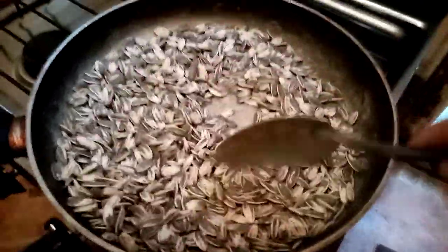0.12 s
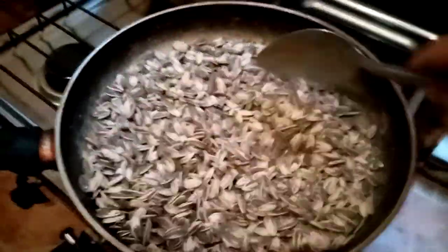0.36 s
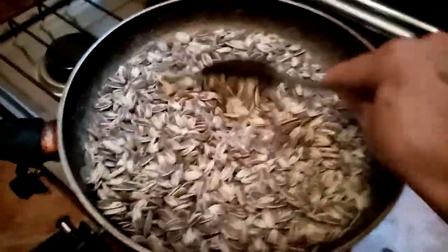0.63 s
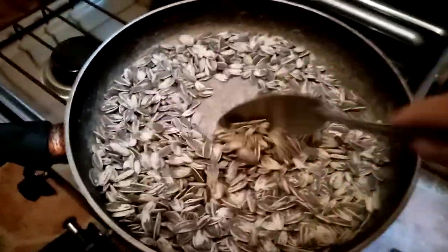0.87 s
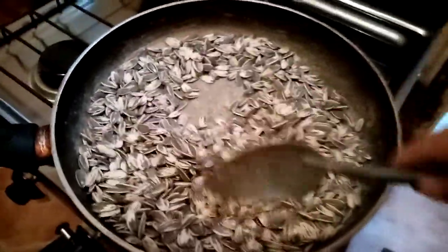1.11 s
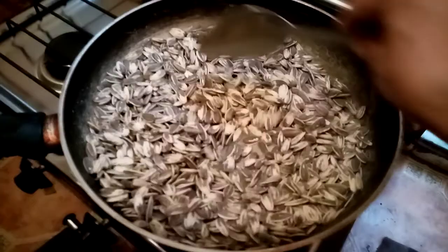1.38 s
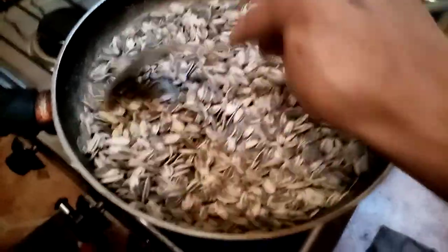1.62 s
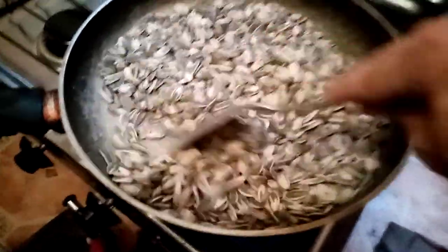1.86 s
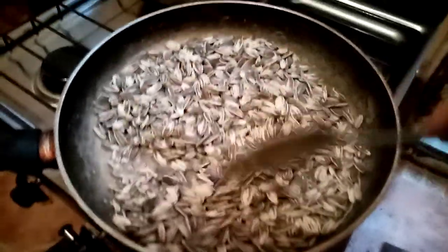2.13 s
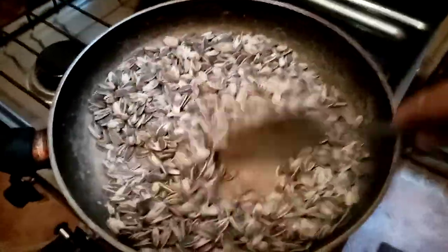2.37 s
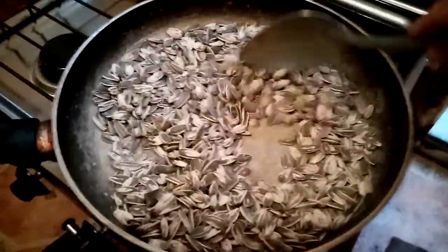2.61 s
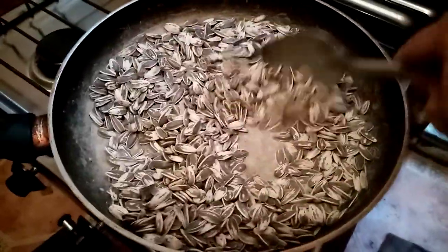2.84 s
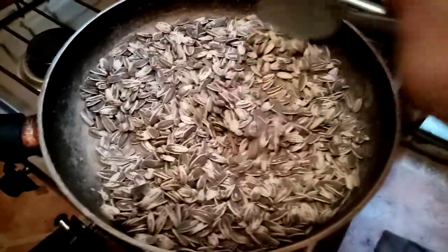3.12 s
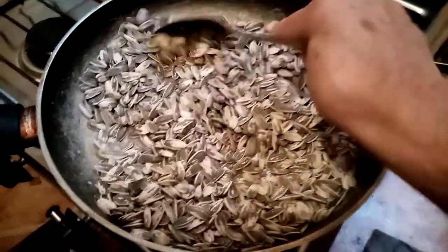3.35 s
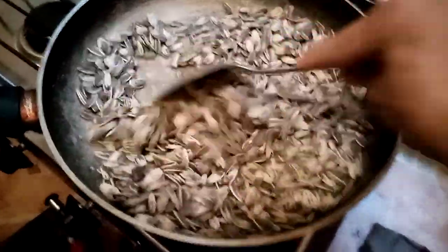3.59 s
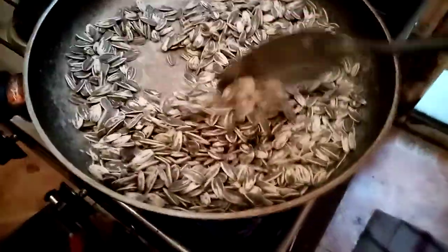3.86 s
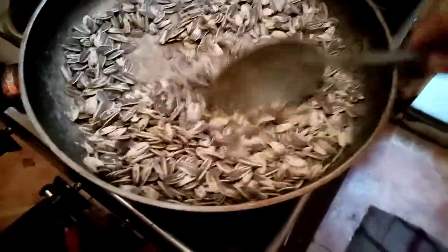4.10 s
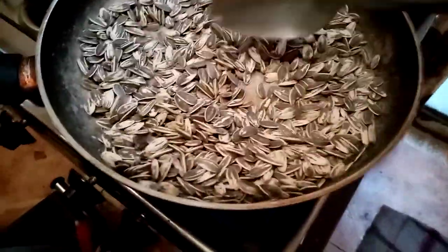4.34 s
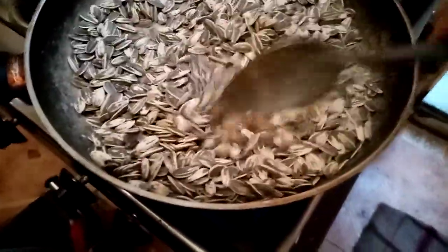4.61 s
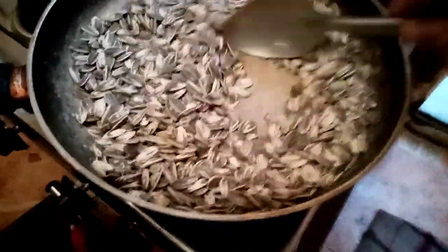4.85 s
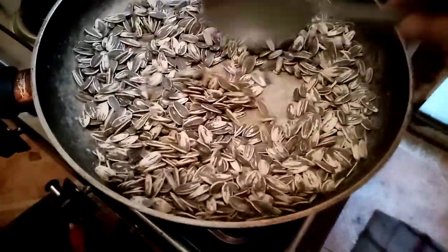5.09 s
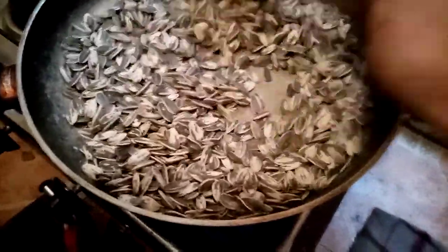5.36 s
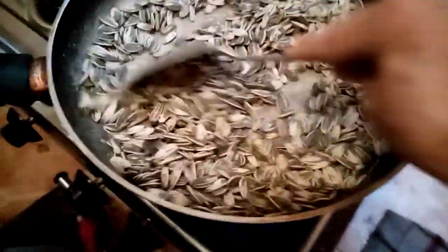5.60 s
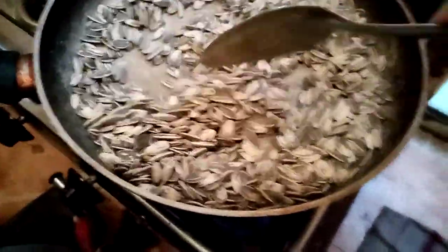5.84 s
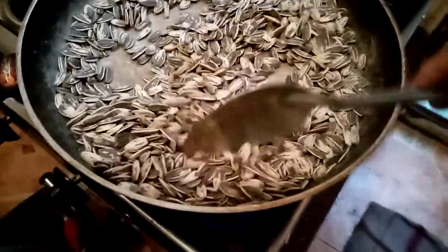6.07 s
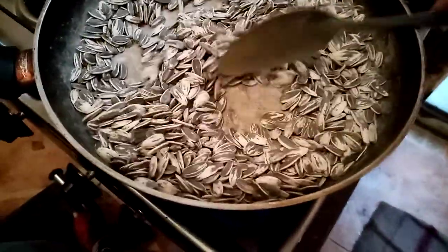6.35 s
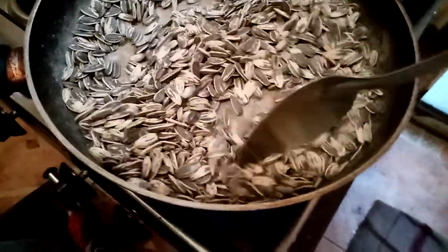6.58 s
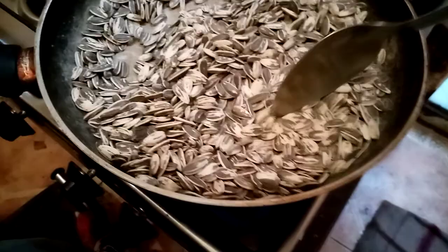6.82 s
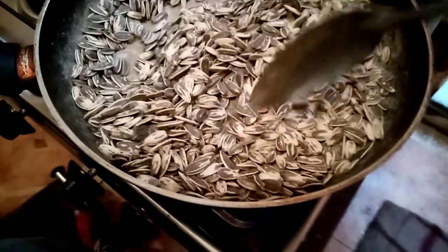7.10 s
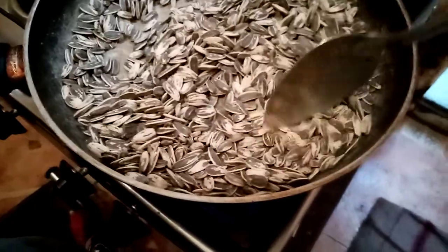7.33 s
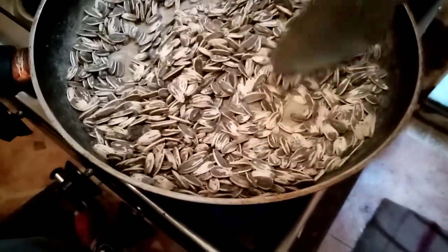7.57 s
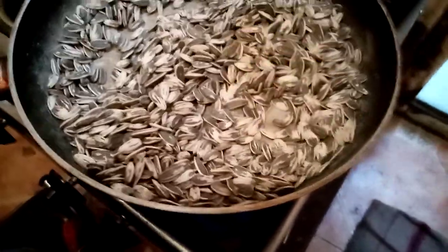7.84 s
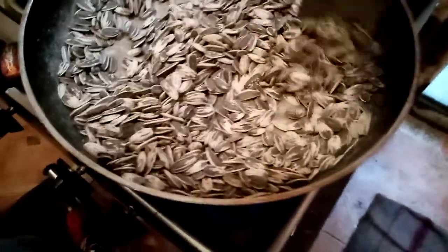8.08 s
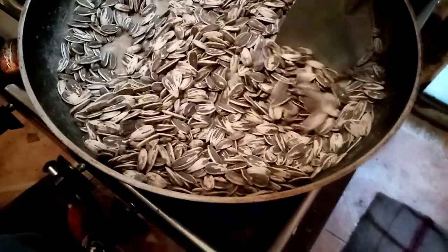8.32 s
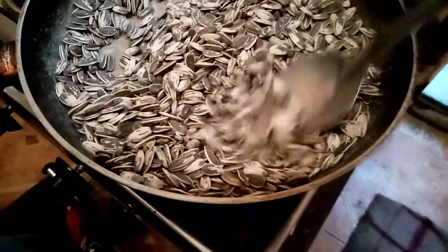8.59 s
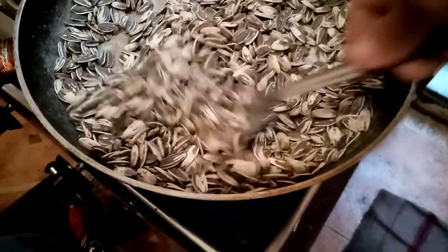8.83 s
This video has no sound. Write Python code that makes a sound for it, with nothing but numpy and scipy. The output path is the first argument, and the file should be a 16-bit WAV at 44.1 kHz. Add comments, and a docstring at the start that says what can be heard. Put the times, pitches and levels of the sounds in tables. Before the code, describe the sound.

A metal spoon stirs dry seeds in a frying pan, close and dry with a very short room response. It starts mid-stroke; light clinks come at 0.15 and 0.25 s, then a firm scraping push with a cluster of dull bottom knocks around 0.75-0.85. Softer rustling follows, then a sharp rattling push and thud near 1.75. Strokes at 2.4-4.2 s swell and fade in crisp shell clatter, with a knock at 3.45. The brightest clink lands at 4.6, followed by busy scraping to 5.8. A lower bowl tap sounds near 6.27 and a sharp tap at 6.68. Small, quick pushes thin to quiet ticks around 7.7-8.0, then a strong clink and bump near 8.2 lead into renewed rattling to the end at about 9 s. A faint low flame flutters throughout, with slight hiss. Sound is on the left; the right only hisses.

```python
"""Stirring seeds over a gas flame

A steel spoon stirs dry seeds in their shells in a frying pan over a gas burner, heard close up.
Random contacts click as shells and excite damped modes of the spoon; slips sound its bowl and the pan.
Taps are sums of decaying modes after a noise crack; bumps are short pushes that ring the pan bottom.
Filtered noise with swelling level is the flame, steady filtered noise the hiss of the kitchen.
Only the left input carries a microphone; the right one holds the hiss of its amplifier."""
import sys
import numpy as np
from scipy import signal
from scipy.fft import rfft, irfft
from scipy.io import wavfile
from scipy.ndimage import uniform_filter1d, map_coordinates

SR = 44100
rng = np.random.default_rng(int(sys.argv[2]) if len(sys.argv) > 2 else 0)


def attenuation_scalar(level_db):
    """Turn a level in dB into a linear amplitude multiplier (20 dB per decade)."""
    decades = np.asarray(level_db, float) / 20
    return 10 ** decades


def to_wav(sig):
    """Store sig (one row per channel, or 1-D mono) as 16-bit WAV at the path in sys.argv[1].

    Samples outside -1..1 are clipped; the rate is SR.
    """
    pcm = np.clip(np.atleast_2d(sig), -1, 1) * 32767
    pcm = np.round(pcm).astype(np.int16)
    wavfile.write(sys.argv[1], SR, pcm.T)  # frames by channels


N = 394694

# All levels in the tables are relative; the functions add the gain of each layer.
# the spoon drops into the seeds and they splash: [t/s, splash level/dB, t60/ms]
LANDINGS = [(0.0, -45, 60), (.244, -27.5, 380), (.538, -33.5, 550), (1.157, -31, 270), (1.722, -33.5, 890),
            (2.143, -31, 200), (2.273, -33, 100), (3.215, -32, 330), (3.985, -36, 430), (4.354, -35, 160),
            (4.588, -23, 200), (5.311, -27.5, 420), (6.087, -36, 600), (6.119, -25, 110),
            (6.494, -31.5, 60), (6.672, -29, 790), (7.314, -32.5, 420), (8.048, -31, 800)]
# the spoon pushes through the seeds: [peak t/s, clatter level/dB, time to rise 10 dB/ms,
# slide under the bowl over the clatter/dB, pressure on the bottom over the clatter/dB]
PUSHES = [(0.01, -37.2, 75, -6.0, -8.0), (0.201, -42.5, 52.5, -2.5, -4.5), (0.303, -43.5, 89.5, -0.5, -4),
          (0.73, -31.5, 97, -8, -12.5), (0.772, -37, 31.5, -3, 10.5), (0.837, -37.8, 77, -3, 4.5),
          (1.037, -44.8, 171.5, -9, -7.5), (1.238, -35.6, 79, -5, -12.0), (1.344, -37, 87, -5.0, -4.0),
          (1.74, -27.5, 12.5, -32, -17), (1.794, -41.5, 23, 1, 9.5), (1.918, -33.0, 94, -2.0, -2),
          (2.03, -47, 206.5, -10.0, -5.5), (2.384, -32, 74.5, -5.5, -25), (2.471, -33.5, 83, -3.5, -1.0),
          (2.693, -41.5, 59, -9.5, -11.5), (2.822, -34.5, 56.5, -12.5, -14.5), (2.939, -33, 54, -6, -8.5),
          (3.069, -41.5, 105.5, -5, -6), (3.277, -34, 14.5, -15, -28), (3.416, -32.5, 120, -15.5, -14.5),
          (3.544, -32.7, 71, -6.5, -8.5), (3.626, -29.2, 39, 0, -9.0), (3.697, -34, 65.5, -1.0, 0.5),
          (3.859, -45.5, 131, -6.0, -6), (4.034, -37.5, 57, -9.5, -15.5), (4.167, -31.5, 43, -10.5, -27),
          (4.225, -34.8, 102, -3.5, -5.5), (4.664, -31.5, 39.5, -6.5, -16.5), (4.76, -28.5, 55, -5.5, -6.5),
          (4.88, -36.5, 90.5, -1.5, -5.5), (5.073, -37.5, 70.5, -6.5, -6.0), (5.209, -47, 59, -2.5, -4.5),
          (5.442, -33.5, 66, -10.0, -20.5), (5.599, -30.5, 100, -6.5, -8.5),
          (5.684, -50.5, 89.5, 10.5, -17), (5.774, -37, 76, -2, -5.5), (6.014, -54, 250, 2.5, 0),
          (6.248, -30, 48, -5.5, -29), (6.314, -36, 82, -1, 3), (6.509, -47.5, 69.5, -1, -3.0),
          (6.751, -45, 157.5, 1, -4.0), (6.853, -36.5, 12, -4.5, -14), (6.915, -37, 11.5, -25, -28),
          (7.003, -42.2, 40, -9.0, -11.0), (7.378, -38.5, 62.5, -8.5, -13.0),
          (7.48, -38.5, 20.5, -8.0, -9.0), (7.528, -37, 10.5, -3, -13.5), (7.593, -41, 53, -1, -12),
          (7.72, -59.5, 38.5, 5, -2.0), (8.158, -33.5, 86, -7.5, -24), (8.221, -33, 32.5, 1, 0.5),
          (8.3, -35, 50, -3.5, -2.0), (8.385, -48, 118.5, -2, -4), (8.665, -34, 91, -3, -1.5),
          (8.804, -33.5, 71, 0.5, -5.5), (8.93, -34, 97, -6, -20)]
# one row each for clatter, slide, drag: [layer gain/dB, landing splash/dB, jolt of a bump/dB]
STROKE_LAYERS = [(0.78, -1, -25.5), (1.78, -18, -24.5), (1.16, -27.5, -17)]
# hollow shells clicking: [f/Hz, spectral level/dB]
SHELL_COLOUR = [(500, -67.5), (1800, -31), (2600, -2), (3500, -6.5), (5500, -4), (7300, -4.5), (16000, 2)]
# shells differ in size, each with its own short note: [f/Hz, level/dB, t60/s]
SHELL_NOTES = [(2900, -9, .008), (3400, -4, .008), (4000, -4, .007), (4600, -4, .007), (5300, -4, .006),
               (6000, -3, .006), (6700, -2, .006), (7300, 0, .006), (8500, -1, .004)]
# stiff modes of the spoon: [f/Hz, level/dB, free t60/s]
SPOON_MODES = [(3730, -8, .15), (4532, -5, .15), (4845, -8, .15), (5257, -9, .28), (5710, -3, .18),
               (6210, -8, .12), (7025, -5, .15), (7058, -3, .27), (7310, -5, .1), (7447, 0, .15),
               (8400, -5, .12), (9095, 0, .15), (9430, -2, .12), (10100, -3, .1), (11700, 0, .04),
               (12300, 0, .1), (14600, 0, .1), (15300, 3, .1)]
# bending modes of the spoon's bowl: [f/Hz, level/dB, free t60/s]
BOWL_MODES = [(1080, -9, .25), (1660, -5, .2), (1695, -2, .25), (1932, -7, .25), (2552, -6, .22),
              (3420, -8, .2), (3465, -6, .25)]
# shells sliding under the bowl: [f/Hz, spectral level/dB]
SLIDE_COLOUR = [(400, -17.5), (1300, -13), (1700, -0.5), (2600, 7), (3300, -11.5), (7000, -26.5)]
# dull body of the drag: [f/Hz, spectral level/dB]
DRAG_COLOUR = [(60, -75.5), (200, -37.5), (420, -8.5), (600, -0.5), (1200, 3), (1450, -20.5), (2500, -36),
               (6000, -55)]
# modes of the pan bottom, damped by the seeds: [f/Hz, level/dB, t60/s before further damping]
PAN_MODES = [(489, -4, .06), (570, -4, .05), (640, -2, .06), (775, 1.5, .07), (975, -3, .06),
             (1047, -2, .06), (1139, -2, .06), (1195, -3, .05)]
# the gas flame: [f/Hz, spectral level/dB]
FLAME_COLOUR = [(24, -8.5), (40, -17), (64, -21), (108, -13.5), (148, -2.5), (172, -11), (207, 2),
                (240, -7), (342, -7), (377, -26), (420, -16.5), (550, -39), (920, -120)]
# the flame swells: [peak t/s, level/dB, time to fall 10 dB on either side/s (its sign has no effect)]
FLARES = [(.01, -48, -0.13), (.69, -43, 0.36), (1.45, -46.5, 0.34), (1.82, -34, 0.0855), (1.98, -41, 0.33),
          (2.14, -39.5, 0.08), (2.79, -36.5, 0.14), (3.33, -46, 0.56), (3.6, -43, 0.56), (3.95, -38.5, 0.2),
          (4.31, -43, -0.03), (4.64, -41, 0.04), (4.95, -43.5, 0.24), (5.63, -45, 0.5), (6.17, -43.5, 0.27),
          (6.77, -38.5, -0.03), (7.03, -49, -0.24), (7.38, -43.5, -0.1), (8.22, -42, 0.02),
          (8.42, -46.5, 0.17), (8.9, -45, 0.83)]
# faint hiss of the kitchen: [f/Hz, spectral level/dB]
KITCHEN_COLOUR = [(240, -23.5), (400, -5.5), (462, -2), (830, -7), (2010, -12.5), (7210, -17.5),
                  (9000, -35.5), (11700, -69), (19800, -120)]
# the spoon's edge bumps the pan bottom: [t/s before the onset delay, level/dB]
BUMPS = [(.029, -21), (.745, -8), (.758, -7.5), (.768, -21.5), (.798, -5), (.82, -7), (1.737, -29),
         (1.784, -4.5), (2.012, -12), (2.46, -12.5), (3.457, -5), (3.534, -17), (4.776, -11), (5.566, -13),
         (5.773, -19.5), (6.33, -13.5), (6.342, -13), (8.192, -8), (8.285, -10.5), (8.459, -29),
         (8.665, -9.5), (8.771, -24)]
# the spoon strikes shells or rim: [t/s, level/dB, leading mode f/Hz, share of the free ring time 0-1]
TAPS = [(0.1497, -27.5, 4220, 0.04), (0.245, -15, 7470, 0.14), (0.539, -22, 7430, 0.05),
        (.5654, -22.5, 7450, 0.18), (.6893, -17.5, 7350, 0.19), (1.0448, -34, 5260, 0.6),
        (1.1573, -28, 7040, .1), (1.178, -22, 7040, 0.2), (1.255, -21, 7460, 0.3), (1.722, -28, 7400, 0.3),
        (1.733, -26, 7070, .02), (2.1431, -26, 5260, 0.85), (2.3686, -19.5, 5710, 0.15),
        (2.6923, -28, 7450, 0.25), (2.8956, -22, 7280, 0.22), (2.924, -18, 7270, 0.13),
        (3.0899, -26, 3490, 0.22), (3.2176, -21.5, 7330, 0.1), (3.2892, -26, 3750, 0.19),
        (3.8382, -25, 3720, 0), (3.8752, -28, 7100, 0), (3.9853, -22, 7450, 0.06), (4.1659, -21, 7120, 0.1),
        (4.2138, -16, 7490, 0.18), (4.3546, -24, 4520, 0.15), (4.5384, -50, 5680, .16),
        (4.5975, -10.5, 7500, 0.2), (4.6607, -15, 7060, 0.07), (4.7358, -19, 7010, 0.6),
        (5.076, -21, 7060, 0.12), (5.1138, -28, 7330, 0.2), (5.1911, -35, 7000, 0.17),
        (5.253, -35, 3460, 0.2), (5.3107, -19.5, 7430, 0.17), (5.5244, -19.5, 7250, 0.3),
        (5.5865, -14.5, 7020, 0.2), (5.683, -21.5, 7020, 0.33), (6.0886, -26.5, 5270, 0.17),
        (6.12, -23.5, 7410, 0.2), (6.2228, -16, 7460, 0.15), (6.267, -13, 1680, .06),
        (6.4944, -26, 5740, 0.26), (6.6781, -14.5, 3890, 0.09), (6.7115, -21, 7050, .22),
        (6.7595, -23, 7440, 0.22), (6.8446, -24, 5860, 0.14), (7.0287, -37.5, 5270, 0.5),
        (7.084, -40, 7080, 0.13), (7.126, -46, 1690, 1), (7.14, -50, 1080, 1), (7.1964, -53, 2550, .9),
        (7.2084, -56, 3465, .8), (7.3166, -23, 5280, .22), (7.36, -29, 3490, .13), (7.416, -22, 4520, 0.13),
        (7.5235, -28.5, 3650, 0.27), (7.7263, -41.5, 3480, 0.2), (7.9794, -60, 1930, .26),
        (8.0476, -31, 4800, 0.1), (8.0539, -24, 7040, 0.3), (8.0716, -27, 7050, 0.07),
        (8.104, -25, 7260, 0.3), (8.1933, -12.5, 1700, 0.21), (8.2406, -22.5, 5710, 0.33)]
# response of the microphone: [f/Hz, gain/dB]
MICROPHONE = [(20, -51.5), (60, -7), (110, -4), (7550, -3), (8200, -16.5), (9600, -20), (10700, -28.5),
              (13000, -36), (15000, -31), (16000, -36.5)]
# amplifier hiss of the unused input: [f/Hz, spectral level/dB]
AMPLIFIER_COLOUR = [(20, -16), (60, -3), (110, 0), (300, -7), (800, -13), (2000, -17), (6000, -19),
                    (8000, -30), (13500, -32), (15000, -22)]


def unit(x):
    """Normalisation: the mean power is scaled to 1."""
    return x / np.sqrt(np.mean(x ** 2) + 1e-20)


def wobble(rate):
    """Random modulation: straight lines join independent normal knots, rate of them a second."""
    knots = rng.standard_normal(int(N * rate / SR) + 4)
    return map_coordinates(knots, [np.arange(N) * rate / SR], order=1)


def coloured(x, points):
    """Minimum-phase filtering: the folded cepstrum turns (Hz, dB) gains into a causal response."""
    hz, db = np.transpose(points)
    size = 4096
    # the 1 Hz offset avoids the logarithm of zero
    log_hz = np.log(np.fft.rfftfreq(size, 1 / SR) + 1)
    gain = attenuation_scalar(np.interp(log_hz, np.log(hz), db))
    cepstrum = irfft(np.log(gain))
    cepstrum[1:size // 2] *= 2
    cepstrum[size // 2 + 1:] = 0
    response = irfft(np.exp(rfft(cepstrum)))
    return signal.oaconvolve(x, response)[:N]


def contacts(per_second, spread_db):
    """Shot noise: random single contacts, most small and a few large, with rms 1."""
    chance, size, sign = rng.random(N), rng.exponential(size=N), rng.standard_normal(N)
    happens = chance < per_second / SR
    return unit(happens * attenuation_scalar(spread_db * np.minimum(size, 5.5)) * sign)


def clicks(force, points):
    """Impulse response: each contact sounds as a short click of this colour, the level kept."""
    filter_gain = np.std(coloured(rng.standard_normal(N), points))
    return coloured(force, points) / filter_gain


def ringing(force, modes, damping, move_db, move_rate):
    """Modal resonance: force rings each mode; the contact point wanders, so each swells on its own."""
    out = np.zeros(N)
    for hz, db, t60 in modes:
        radius = attenuation_scalar(-60 / (t60 * damping * SR))  # decay per sample
        drive = force * attenuation_scalar(db + move_db * wobble(move_rate))
        zeros = np.sqrt(1 - radius * radius) / 2 * np.array([1, 0, -1])
        poles = [1, -2 * radius * np.cos(2 * np.pi * hz / SR), radius * radius]
        out += signal.lfilter(zeros, poles, drive)
    return out


def dying(t, s, db, t60):
    """Exponential decay: each event raises the power at once, which falls 60 dB in t60."""
    power = attenuation_scalar(2 * (db - 60 * np.abs(t - s) / t60))
    return (power * (t >= s)).sum(axis=0)


def stroke_levels():
    """Addition of powers: landings and bumps die away; pushes swell and fade, never before their landing."""
    step = 64  # samples
    fall_over_rise, jolt_t60_s = 1.58, 0.065
    settle_db, settle_t60_s = -21.5, 0.6
    t = np.arange(0, N + step, step) / SR
    landing_s, landing_db, landing_t60_ms = np.transpose(LANDINGS)
    splash = dying(t, landing_s[:, None], landing_db[:, None], landing_t60_ms[:, None] / 1000)
    bump_s, bump_db = np.transpose(BUMPS)[:, :, None]
    jolt = dying(t, bump_s, bump_db, jolt_t60_s)
    s, db, rise_ms, slide_db, press_db = np.transpose(PUSHES)[:, :, None]
    width_s = rise_ms / 1000 * np.where(t < s, 1, fall_over_rise)
    swell_db = db - 10 * ((t - s) / width_s) ** 2
    landed = t >= landing_s[np.searchsorted(landing_s, s) - 1]
    levels, keep = [], attenuation_scalar(-120 * step / SR / settle_t60_s)
    for (gain_db, splash_db, jolt_db), share_db in zip(STROKE_LAYERS, (0, slide_db, press_db)):
        pushes = (landed * attenuation_scalar(2 * (swell_db + share_db))).sum(axis=0)
        power = pushes + attenuation_scalar(2 * splash_db) * splash + attenuation_scalar(2 * jolt_db) * jolt + 1e-10
        # stray shells roll on after each movement
        settling = signal.lfilter([1 - keep], [1, -keep], power)
        power = power + attenuation_scalar(2 * settle_db) * settling
        levels.append(gain_db + np.interp(np.arange(N) / SR, t, 10 * np.log10(power)))
    return levels


def shell_clatter(level_db, clumps):
    """Excitation by many impacts: shells tumble in clumps, sound their own notes and ring the spoon."""
    # a slower spoon moves fewer shells: the clatter thins out to single ticks
    per_second = 12000 * np.clip(attenuation_scalar(0.96 * (level_db + 38.5)), 0.05, 1)

    def tumble(share):
        """Shot noise of a share of the contacts, at the level of the clatter."""
        ticks = contacts(per_second * share, spread_db=2.5)
        return attenuation_scalar(level_db) * unit(clumps * ticks / np.sqrt(per_second))

    ticks = tumble(1)
    notes = np.zeros(N)
    for note in SHELL_NOTES:
        # each size of shell has contacts of its own
        notes += ringing(tumble(0.06), [note], damping=1, move_db=4, move_rate=45)
    spoon = ringing(ticks, SPOON_MODES, damping=0.28, move_db=5.5, move_rate=13)
    return attenuation_scalar(1.0) * clicks(ticks, SHELL_COLOUR) + attenuation_scalar(-2.5) * notes + attenuation_scalar(-6) * spoon


def shell_slide(level_db, clumps):
    """Sliding friction: shells slip under the bowl and excite its strongly damped bending modes."""
    slips = attenuation_scalar(level_db) * unit(clumps * contacts(5000, spread_db=2))
    pressed = ringing(slips, BOWL_MODES, damping=0.1, move_db=6, move_rate=8)
    return attenuation_scalar(-3) * clicks(slips, SLIDE_COLOUR) + attenuation_scalar(-1.5) * pressed


def edge_drag(level_db):
    """Stuttering friction: the edge drags along the bottom and excites the modes of the pan."""
    unevenness = attenuation_scalar(1.6 * wobble(60))
    stutter = attenuation_scalar(level_db) * unit(unevenness * contacts(2500, spread_db=1.4))
    pan = ringing(stutter, PAN_MODES, damping=1.0, move_db=2.0, move_rate=11)
    return attenuation_scalar(-1.5) * clicks(stutter, DRAG_COLOUR) + attenuation_scalar(-3.0) * pan


def stirring():
    """Superposition: clatter and slide share the clumps of shells, and the drag is added."""
    clatter_db, slide_db, drag_db = stroke_levels()
    clumps = attenuation_scalar(1.4 * wobble(35) + 0.97 * wobble(110))
    return shell_clatter(clatter_db, clumps) + shell_slide(slide_db, clumps) + edge_drag(drag_db)


def flame():
    """Modulated noise: the gas flame hums low, flutters and swells, the powers of its flares adding."""
    t = np.arange(N) / SR
    coarse_t = t[::64]
    power = attenuation_scalar(2 * -53)  # between the flares
    for s, db, width_s in FLARES:
        power = power + attenuation_scalar(2 * db - 20 * np.minimum(((coarse_t - s) / width_s) ** 2, 9))
    level = np.interp(t, coarse_t, np.sqrt(power))
    flutter = attenuation_scalar(1.6 * wobble(12))
    return level * flutter * unit(coloured(rng.standard_normal(N), FLAME_COLOUR))


def kitchen():
    """Stationary noise: the faint hiss of the kitchen."""
    return attenuation_scalar(-69.5) * unit(coloured(rng.standard_normal(N), KITCHEN_COLOUR))


def bumps():
    """Pulse excitation: each bump is a short decaying push that rings the pan bottom."""
    push, t = np.zeros(N + SR), np.arange(SR // 50) / SR
    push_hz, onset_delay_s = 1020, 0.0011
    cycles = t * push_hz
    shape = cycles ** 1.5 * np.exp(-3 * cycles) * np.sin(2 * np.pi * cycles)
    for s, db in BUMPS:
        start = round((s + onset_delay_s) * SR)
        push[start:start + len(t)] -= attenuation_scalar(db + 17.5) * shape
    push = push[:N]
    ring = ringing(push, PAN_MODES + BOWL_MODES[:3], damping=0.62, move_db=0.5, move_rate=30)
    return push + attenuation_scalar(-23.0) * ring


def taps():
    """Modal decay after impact: a short crack, then the mode nearest the struck spot leads the ring."""
    out, t = np.zeros(N + SR), np.arange(SR // 3) / SR
    hz, level, t60 = np.transpose(BOWL_MODES + SPOON_MODES)[:, :, None]
    for s, db, lead_hz, free in TAPS:
        distance = np.abs(hz - lead_hz)
        leads = distance == distance.min()
        # a light strike hardly moves the low, heavy modes unless it lands on them
        strength = level - 6 * (hz < 3000) + 11 * leads + 3 * rng.standard_normal(hz.shape)
        decay = attenuation_scalar(strength - 60 * t / (t60 * np.clip(free, 0.02, 1)))
        modes = decay * np.sin(2 * np.pi * (hz * t + rng.random(hz.shape)))
        onset = 1 - np.exp(-t / 0.00033)
        ring = modes.sum(axis=0) * onset / np.linalg.norm(attenuation_scalar(strength))
        # differencing twice brightens the noise
        bright = np.gradient(np.gradient(rng.standard_normal(len(t)))) / 0.23
        crack = 0.26 * attenuation_scalar(-60 * t / 0.029) * bright
        start = round(s * SR)
        out[start:start + len(t)] += attenuation_scalar(db + 5.0) * (ring + crack)
    return out[:N]


def walls(x):
    """Diffuse reverberation: decaying noise is the short answer from the pan wall and the kitchen."""
    t = np.arange(SR // 3) / SR
    tail = rng.standard_normal(len(t)) * attenuation_scalar(-60 * t / 0.18)
    delayed = np.pad(x, (130, 0))  # samples
    return signal.oaconvolve(delayed, tail / np.linalg.norm(tail))[:N]


def treble_dropouts(x, from_hz, depth_db):
    """Time-frequency masking: random patches of the top treble drop out."""
    hz, t, z = signal.stft(x, SR, nperseg=1024)
    field = uniform_filter1d(rng.standard_normal(z.shape), size=11, axis=0)
    field = uniform_filter1d(field, size=4, axis=1)
    gain = attenuation_scalar(4 - depth_db * np.clip(unit(field) + 0.2, 0, 3))
    z = z * np.where(hz[:, None] > from_hz, gain, 1)
    return signal.istft(z, SR, nperseg=1024)[1][:N]


def scene():
    """Superposition: everything reaches one microphone; the other input has none."""
    pan = stirring() + bumps() + taps()
    left = pan + attenuation_scalar(-11.0) * walls(pan) + flame() + kitchen()
    return np.array([left, np.zeros(N)])


def low_pass(x):
    """Removes everything above the highest recorded frequency."""
    return signal.sosfilt(signal.butter(12, 15600, fs=SR, output="sos"), x)


def record(dry):
    """Transducer response: the deep bass is cut and 7.5 kHz upward dulled; the unused input only hisses."""
    heard = coloured(dry[0], MICROPHONE)
    left = attenuation_scalar(4) * treble_dropouts(heard, from_hz=9800, depth_db=15)
    right = attenuation_scalar(-75.3) * unit(coloured(rng.standard_normal(N), AMPLIFIER_COLOUR))
    return low_pass(np.array([left, right]))


dry = scene()
out = record(dry)
to_wav(out)
```